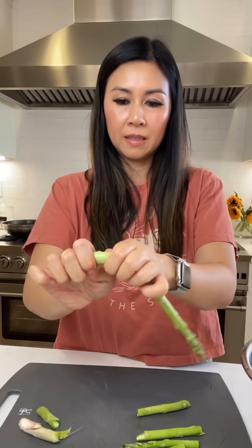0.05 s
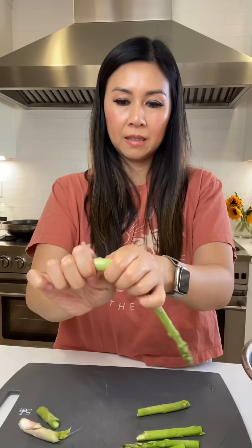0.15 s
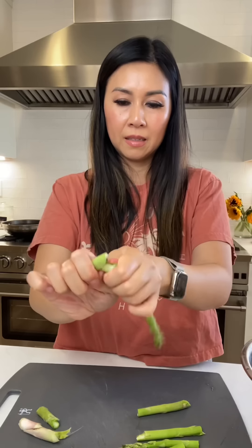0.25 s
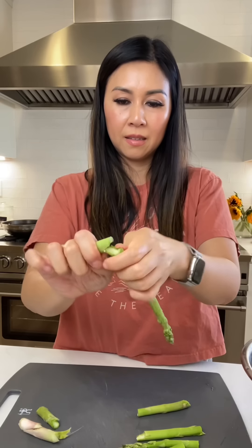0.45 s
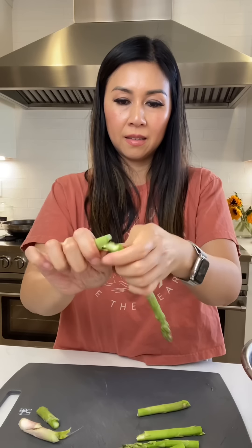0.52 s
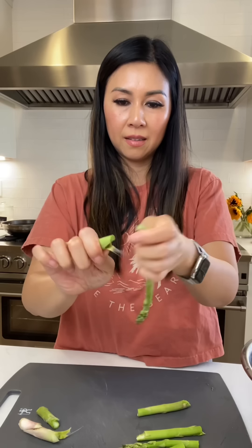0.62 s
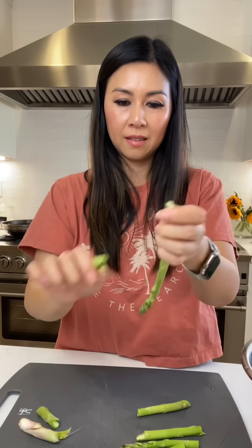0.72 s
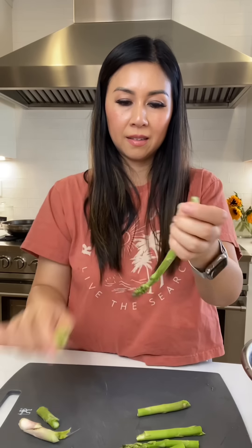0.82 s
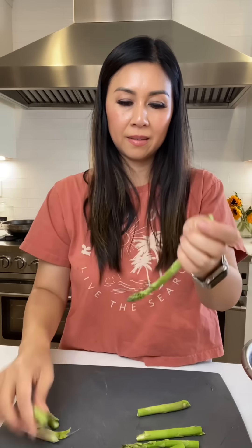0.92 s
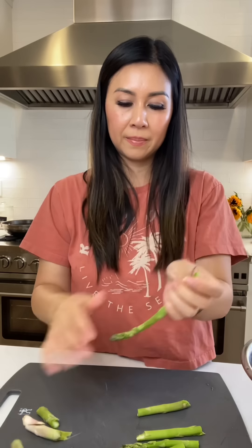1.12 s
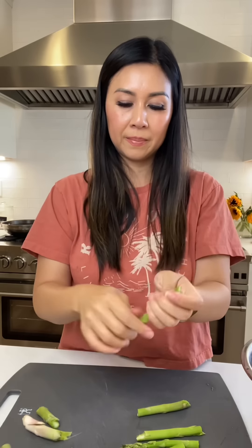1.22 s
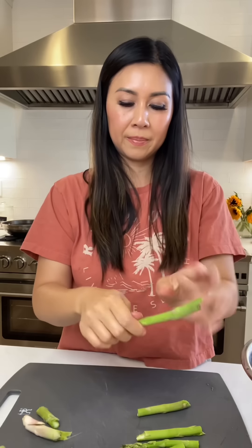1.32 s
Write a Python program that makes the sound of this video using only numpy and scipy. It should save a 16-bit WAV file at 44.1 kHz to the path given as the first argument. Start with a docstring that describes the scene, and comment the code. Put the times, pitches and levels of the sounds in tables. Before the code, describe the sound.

Loud crisp vegetable snap early on, with a short bright room tail, then a tiny rustle, a quiet clicky knock and softer bounces with a dull hand thud on the counter; close stereo pickup, quiet humming kitchen.

```python
"""An asparagus spear is snapped by hand in a hard, lively kitchen: a volley of cracks rings the stalk modes
over a falling pop. Fibres tear and creak softly (filtered noise); the cut end drops on the board and bounces
(struck modes, a tick ahead of each knock) and the hand thuds on the counter. Appliances hum (noise bands).
Diffuse noise, decaying band by band, is the room; two microphone ports hear it all a moment apart."""
import sys
import numpy as np
from scipy import signal
from scipy.fft import rfft, irfft
from scipy.io import wavfile
from scipy.ndimage import uniform_filter1d

SR = 44100
rng = np.random.default_rng(int(sys.argv[2]) if len(sys.argv) > 2 else 0)


def to_wav(sig):
    """Store sig (one row per channel, or 1-D mono) as 16-bit WAV at the path in sys.argv[1].

    Samples outside -1..1 are clipped; the rate is SR.
    """
    pcm = np.clip(np.atleast_2d(sig), -1, 1) * 32767
    pcm = np.round(pcm).astype(np.int16)
    wavfile.write(sys.argv[1], SR, pcm.T)  # frames by channels


N = 59535
T = np.arange(N) / SR
HZ = np.maximum(np.arange(N // 2 + 1) * SR / N, 1)

# Cracks of the snap, with a quieter echo following: t/s, drive level/dB
CRACK_EVENTS = [(0.2036, -16.5), (0.2043, -1), (.2052, -4.5), (.2058, -4), (.2073, -12), (.2084, -10.5)]
# Cut end landing and bouncing: t/s, knock drive/dB, tick drive/dB, tick pitch ratio
LANDINGS = [(0.9737, -26.5, -29.5, 1.037), (1.002, -44, -56, 1.6), (1.123, -35.5, -42.5, 0.894),
            (1.179, -41, -60, 0.71), (1.208, -49, -103, .93)]


def amp(db):
    """Amplitude ratio of a level in dB."""
    return 10 ** (np.asarray(db) / 20)


def over_hz(table):
    """Interpolate (f/Hz, value) rows on a log-frequency axis."""
    f_hz, value = np.array(table).T
    return np.interp(np.log(HZ), np.log(f_hz), value)


def shape(x, gain):
    """Filter by multiplying the spectrum by a gain (circular)."""
    return irfft(rfft(x) * gain, N)


def unit(x):
    """Scale to unit RMS."""
    return x / np.sqrt(np.mean(x ** 2))


def bump(hz, width_hz):
    """Gaussian band gain; the width is two standard deviations."""
    return np.exp(-.5 * ((HZ - hz) / (width_hz / 2)) ** 2)


def decay(t, t60_s):
    """Exponential decay by 60 dB in t60."""
    return np.exp(-np.log(1000) * t / t60_s)


def diffuse():
    """Two noises, correlated per band as a diffuse field is at the two ports."""
    # Likeness of the ports: f/Hz, correlation 0-1
    likeness = [(45, .999), (100, .99), (200, .85), (400, .7), (800, .5), (2000, .4), (4000, .35),
                (7000, .8), (10000, .98), (14000, .9)]
    a, b = rng.standard_normal((2, N))
    corr = np.clip(over_hz(likeness), 0, 1)
    mid = shape(a, np.sqrt((1 + corr) / 2))
    side = shape(b, np.sqrt((1 - corr) / 2))
    return np.array([mid + side, mid - side])


def ring(t0_s, db, modes, rise_s, pitch=1):
    """One blow on damped sine modes (f/Hz, level/dB, t60/s), each randomly detuned and re-levelled."""
    detune, wobble_db = .012, 1.5  # standard deviations: frequency ratio, dB
    t = np.maximum(T - t0_s, 0)
    draws = rng.standard_normal((len(modes), 2))
    out = 0
    for (hz, mode_db, t60_s), (a, b) in zip(modes, draws):
        mode_hz = hz * pitch * (1 + detune * a)
        out = out + amp(mode_db + wobble_db * b) * decay(t, t60_s) * np.sin(2 * np.pi * mode_hz * t)
    return amp(db) * (1 - np.exp(-t / rise_s)) * out


def background():
    """Broad appliance noise in flickering octave bands, plus narrow noise bands as wavering hums."""
    # Broad noise colour: f/Hz, relative density level/dB
    floor_colour = [(30, -8), (55, 5.5), (120, -3), (200, -7), (400, -12.5), (800, -21), (1400, -31),
                    (2000, -31.5), (3000, -26.5), (4200, -36.5), (5500, -38), (8000, -41), (13000, -47.5),
                    (16000, -62)]
    # Fan and fridge hums: f/Hz, width/Hz, RMS level/dB
    hums = [(56, 24, -59), (97, 5.5, -61.5), (123.14, 2.7, -62.5), (320, 15, -73), (2330, 170, -75)]
    floor_db, flicker_db = -57, 4
    noise = shape(diffuse(), amp(over_hz(floor_colour)))
    broad = 0
    for hz in 30 * 2 ** np.arange(10.):
        band = np.cos(np.pi / 2 * np.clip(np.log2(HZ / hz), -1, 1)) ** 2
        flicker = unit(uniform_filter1d(rng.standard_normal(N), size=2500))
        broad = broad + shape(noise, band) * amp(flicker_db * flicker)
    hum = sum(amp(db) * unit(shape(diffuse(), bump(hz, width_hz))) for hz, width_hz, db in hums)
    return amp(floor_db) * unit(broad) + hum


def room(x):
    """Kitchen tail: convolution with diffuse noise that builds up, then dies band by band."""
    # Reverberation time: f/Hz, t60/s
    room_t60 = [(150, 0.5), (600, 0.82), (1500, 0.7941), (3000, 0.95), (5500, 0.686), (9000, 0.53),
                (14000, 0.27)]
    rise_s = 0.0032
    noise, tail, t60_s = diffuse(), 0, over_hz(room_t60)
    for hz in 60 * 2 ** np.arange(0, 8.5, .5):  # half-octave bands
        band = np.cos(np.pi * np.clip(np.log2(HZ / hz), -.5, .5)) ** 2
        tail = tail + shape(noise, band) * decay(T, t60_s[int(hz * N / SR)])
    tail = tail * (1 - np.exp(-(T / rise_s) ** 2))
    tail = tail / np.sqrt(np.sum(tail ** 2) / 2)  # unit energy per port on average
    return signal.fftconvolve(tail, x[None], axes=1)[:, :N]


def click(t0_s, db, gain):
    """Zero-phase click of the given colour and energy level, delayed to t0."""
    x = irfft(gain * np.exp(-2j * np.pi * HZ * t0_s), N)
    return amp(db) * x / np.sqrt(np.sum(x ** 2))


def spread():
    """Room feed of snap and ticks, leaving in all directions: one smooth click for each."""
    # Snap colour as the room returns it: f/Hz, relative density level/dB
    snap_colour = [(150, -19), (300, -20.5), (600, -22), (1200, -16), (2000, -9), (2800, -3.26), (3500, -2),
                   (4300, -0.6), (5200, -13), (6500, -9), (8000, -16), (10000, -13.5), (12500, -21.5),
                   (14500, -27.5), (17000, -68.5)]
    # Tick colour as the room returns it: f/Hz, relative density level/dB
    tick_colour = [(800, -25), (1800, 6), (3000, 1), (4400, 2.5), (5500, -11), (8500, -10.5), (12000, -19),
                   (14000, -50)]
    snap_db, snap_top_hz, tick_wet_db = 6.5, 13800, 0
    loudest_s = max(CRACK_EVENTS, key=lambda row: row[1])[0]
    snap_gain = amp(over_hz(snap_colour)) / (1 + (HZ / snap_top_hz) ** 20)
    tick_gain = amp(over_hz(tick_colour))
    tick_feed = sum(click(t_s, db + tick_wet_db, tick_gain) for t_s, _, db, _ in LANDINGS)
    return click(loudest_s, snap_db, snap_gain) + tick_feed


def fingers():
    """Last fibres tear and fingers slide: grainy bright hiss; the bent stalk creaks: short noise bands."""
    # Tearing hiss envelope: t/s, level/dB
    tear = [(.51, -99.5), (0.534, -65), (.546, -57), (.553, -50), (.562, -54), (.578, -58), (.587, -52.5),
            (.595, -64), (.64, -99)]
    # Creaks: t/s, peak level/dB, f/Hz
    creaks = [(.06, -83, 10000), (.068, -75.5, 12000), (.082, -66, 3600), (.094, -69.5, 3500),
              (.115, -67.5, 3900), (.587, -62, 6400)]
    tear_hz, tear_width_hz, grain_db = 10200, 7000, 3
    creak_s = .005  # standard deviation of the Gaussian envelope
    t_s, tear_db = np.array(tear).T
    grain = amp(grain_db * unit(uniform_filter1d(rng.standard_normal(N), size=60)))
    hiss = unit(shape(rng.standard_normal(N) * grain, bump(tear_hz, tear_width_hz)))
    out = hiss * amp(np.interp(T, t_s, tear_db, -120, -120))
    for t0_s, db, hz in creaks:
        envelope = np.exp(-.5 * ((T - t0_s) / creak_s) ** 2)
        out = out + amp(db) * envelope * unit(shape(rng.standard_normal(N), bump(hz, 0.22 * hz)))
    return out


def knocks():
    """Board modes ring at each landing; counter modes thud under the hand."""
    # Board modes: f/Hz, level/dB, t60/s
    board_modes = [(190.4, -19, 0.18), (299, -24.5, 0.14), (425, -12.5, 0.062), (654, -12.5, 0.043),
                   (715, -8.5, 0.057), (741.7, -12.5, 0.077), (1011, -13.5, 0.065), (1880, -17.5, 0.014)]
    # Hand touching the counter: t/s, drive level/dB
    thumps = [(1.135, -48.5), (1.152, -50.5), (1.188, -49.5)]
    # Counter modes: f/Hz, level/dB, t60/s
    counter_modes = [(157, 3.5, 0.065), (238, 11.5, 0.027), (294, 5.5, 0.024)]
    knock_rise_s, thump_rise_s = 0.00056, 0.0024
    board = sum(ring(t_s, db, board_modes, knock_rise_s) for t_s, db, *_ in LANDINGS)
    counter = sum(ring(t_s, db, counter_modes, thump_rise_s) for t_s, db in thumps)
    return board + counter


def ticks():
    """First contact just ahead of each knock: short high modes, pitched per landing."""
    # Tick modes: f/Hz before the pitch ratio, level/dB, t60/s
    tick_modes = [(3700, -1, 0.0078), (4480, 6, 0.0085), (8130, -2.5, 0.0044), (10900, -18, 0.0086)]
    lead_s, rise_s = 0.0021, 0.00041
    return sum(ring(t_s - lead_s, db, tick_modes, rise_s, pitch) for t_s, _, db, pitch in LANDINGS)


def pop():
    """Low body of the snap: one puff of air, a damped sine whose pitch falls exponentially."""
    start_s, level_db, rise_s, t60_s = .2048, -24.5, 0.0029, 0.046
    top_hz, end_hz, fall_s = 1190, 130, 0.0039
    t = np.maximum(T - start_s, 0)
    hz = end_hz + (top_hz - end_hz) * np.exp(-t / fall_s)
    phase = 2 * np.pi * np.cumsum(hz * (t > 0)) / SR
    return amp(level_db) * (1 - np.exp(-t / rise_s)) * decay(t, t60_s) * np.sin(phase)


def snap():
    """A quick volley of cracks rings the stalk and cupped hands over the pop; left leads in mid bands."""
    # Stalk and hand modes: f/Hz, level/dB, t60/s
    stalk_modes = [(1305, -36, .008), (2375, -24.5, 0.025), (3092, -6.5, 0.0099), (3635, -7.5, 0.014),
                   (4063, -6, 0.011), (5348, -5, 0.0059), (6745, -4.5, .005), (7700, -14.5, .004),
                   (10290, -7.5, 0.0025), (13000, -27.5, 0.0046)]
    # Phase lead at the left port: f/Hz, lead/rad
    left_lead = [(700, 0), (2000, .8), (3800, 2.2), (4500, 0)]
    rise_s = .0001
    x = sum(ring(t_s, db, stalk_modes, rise_s) for t_s, db in CRACK_EVENTS) + pop()
    return np.array([shape(x, np.exp(1j * over_hz(left_lead))), x])


def scene():
    """Direct sources, room and background at two ports; the whole left port is then delayed."""
    hands_wet_db, knock_wet_db = -14.5, -5.5
    left_lag_s = 4 / 44100
    hands, board, tick = fingers(), knocks(), ticks()
    wet = room(spread() + amp(hands_wet_db) * hands + amp(knock_wet_db) * board)
    left, right = snap() + hands + board + tick + wet + background()
    return np.array([shape(left, np.exp(-2j * np.pi * HZ * left_lag_s)), right])


def record(dry):
    """Roll off rumble, clip at full scale, cut the top, clip again."""
    low_hz, top_hz = 37, 16000
    highpass = signal.butter(2, low_hz, "high", fs=SR, output="sos")
    lowpass = signal.ellip(8, .2, 60, top_hz, fs=SR, output="sos")
    x = np.clip(signal.sosfilt(highpass, dry), -1, 1)
    return np.clip(signal.sosfilt(lowpass, x), -1, 1)


dry = scene()
out = record(dry)
to_wav(out)
```